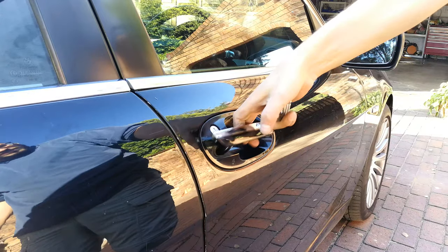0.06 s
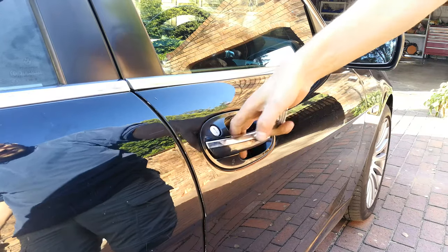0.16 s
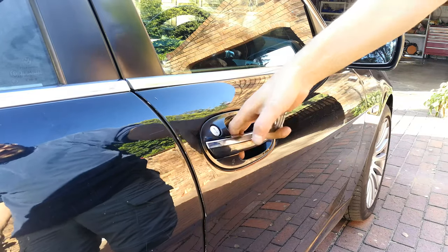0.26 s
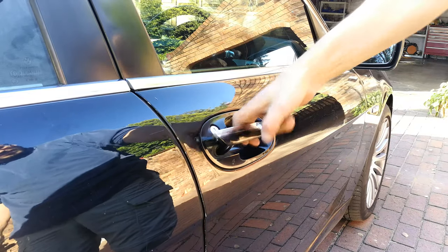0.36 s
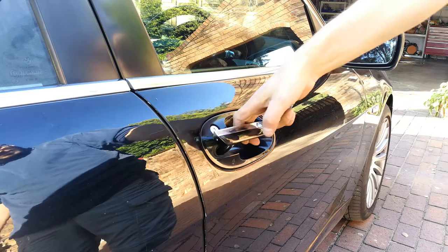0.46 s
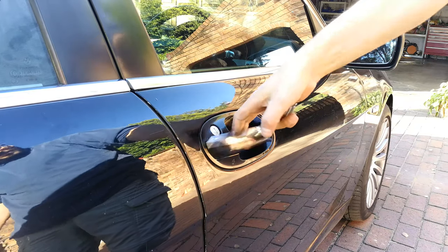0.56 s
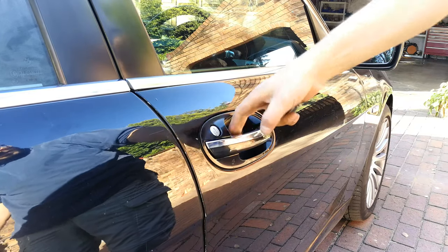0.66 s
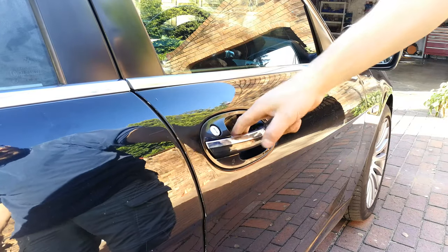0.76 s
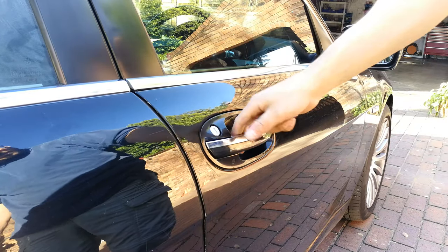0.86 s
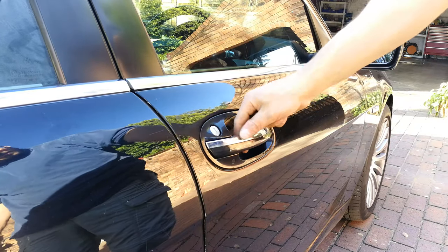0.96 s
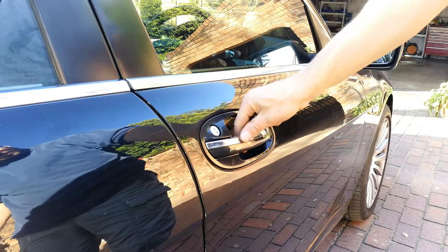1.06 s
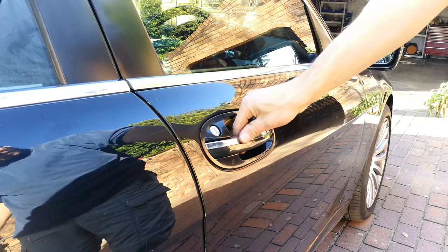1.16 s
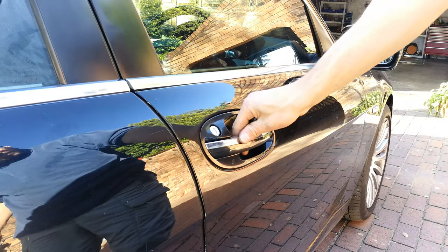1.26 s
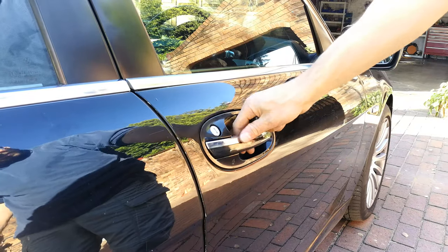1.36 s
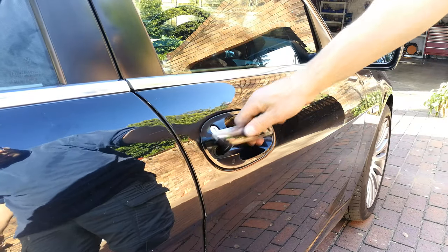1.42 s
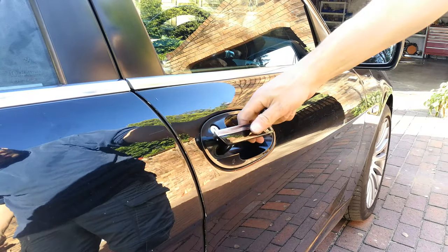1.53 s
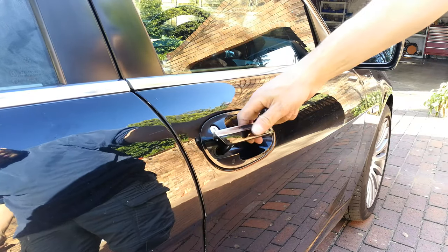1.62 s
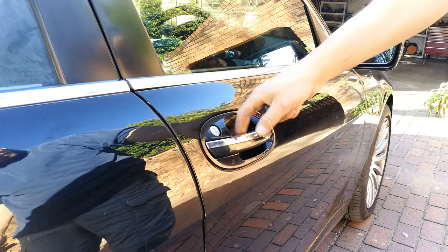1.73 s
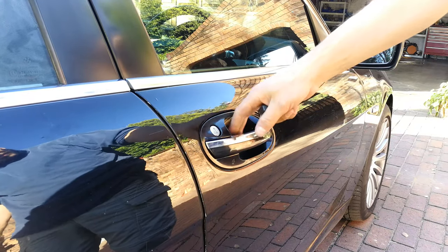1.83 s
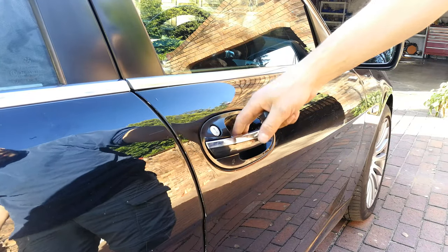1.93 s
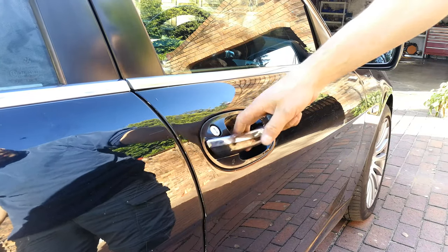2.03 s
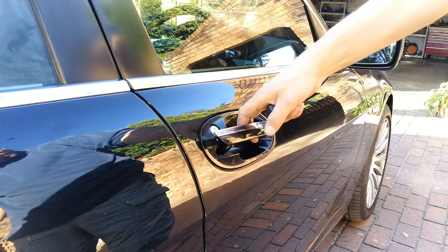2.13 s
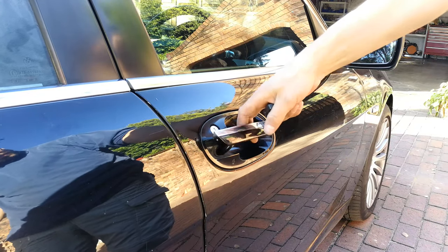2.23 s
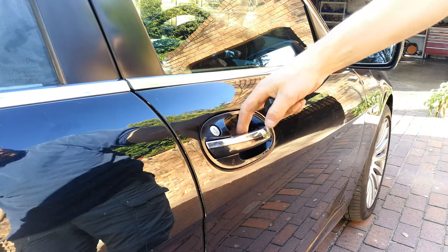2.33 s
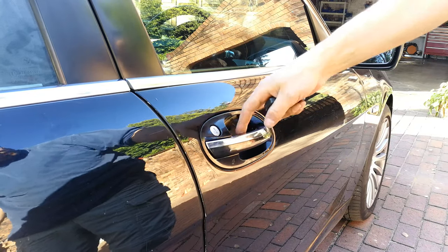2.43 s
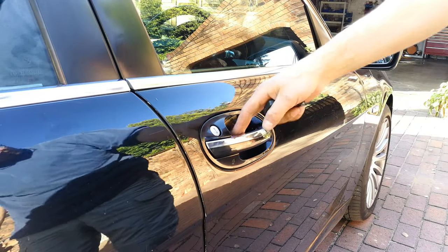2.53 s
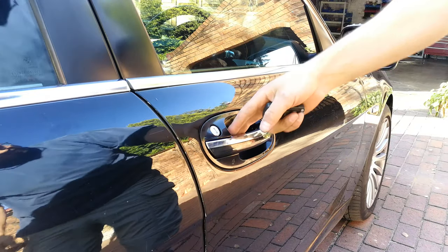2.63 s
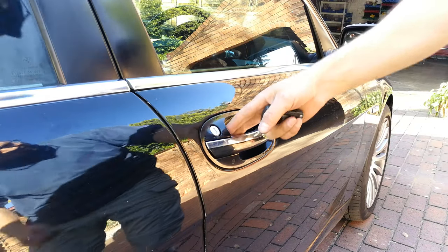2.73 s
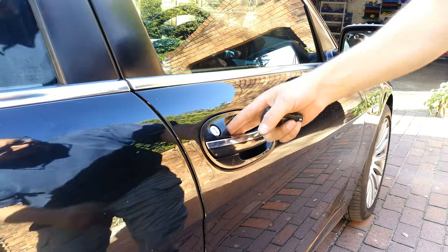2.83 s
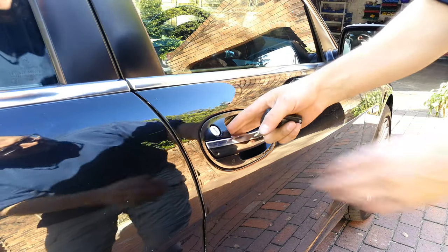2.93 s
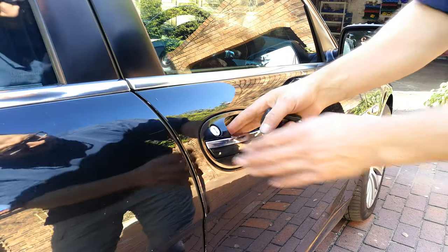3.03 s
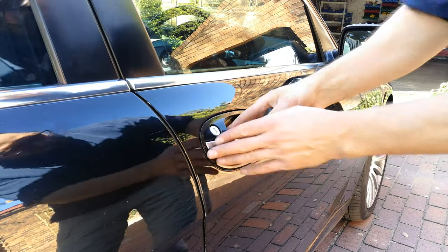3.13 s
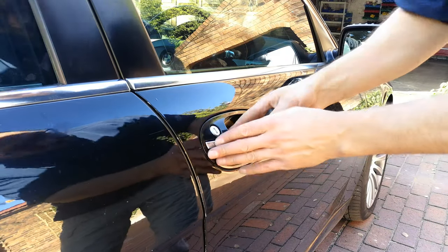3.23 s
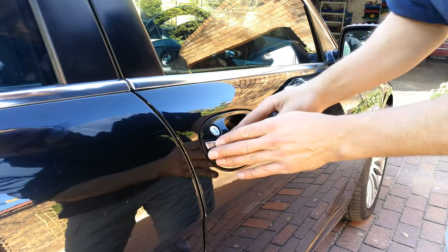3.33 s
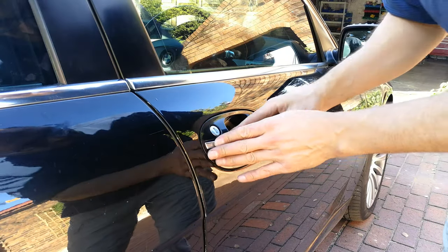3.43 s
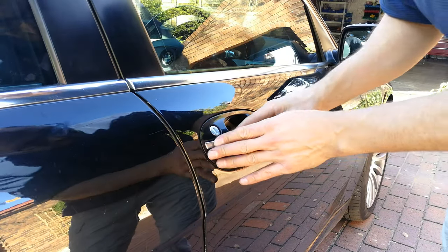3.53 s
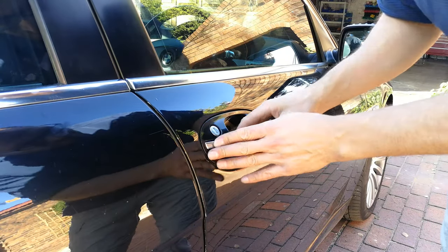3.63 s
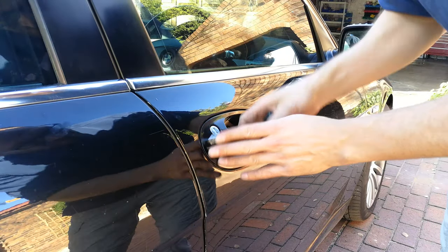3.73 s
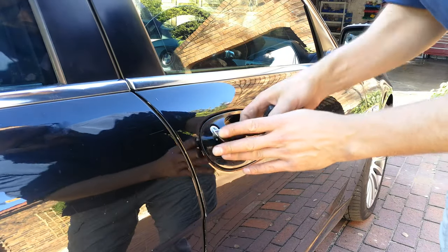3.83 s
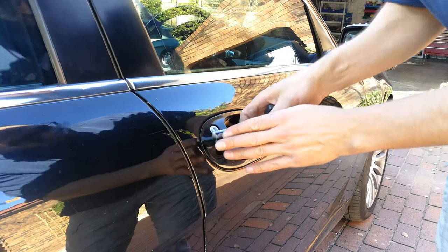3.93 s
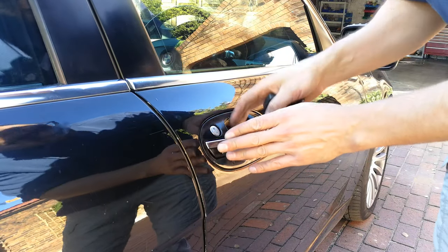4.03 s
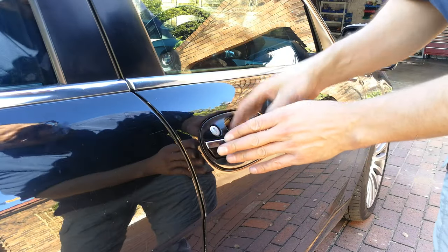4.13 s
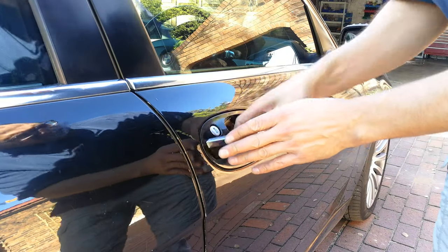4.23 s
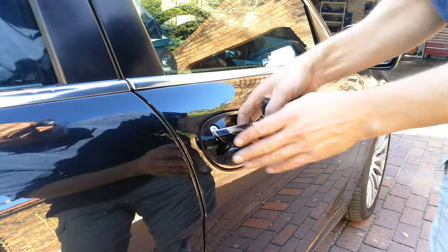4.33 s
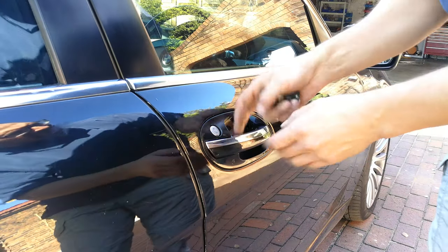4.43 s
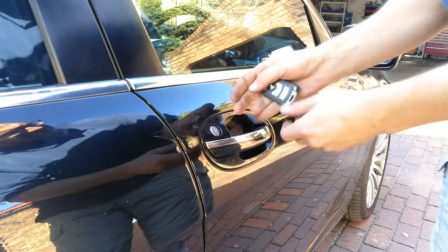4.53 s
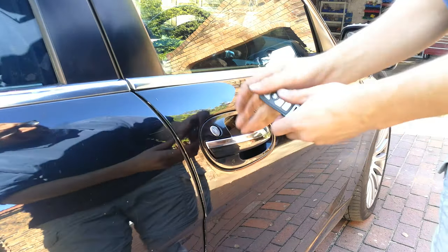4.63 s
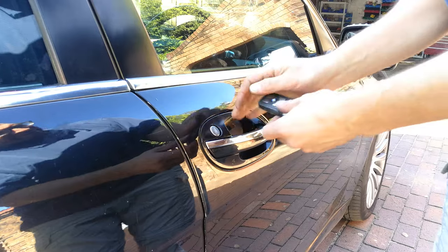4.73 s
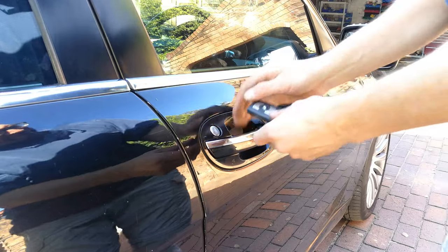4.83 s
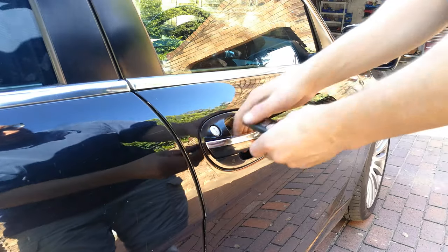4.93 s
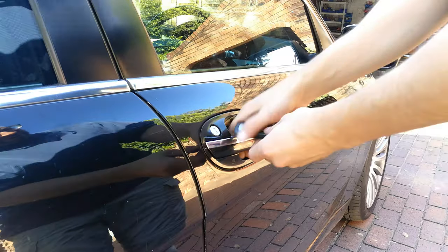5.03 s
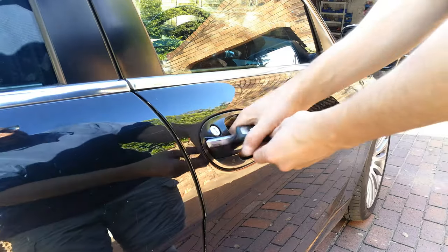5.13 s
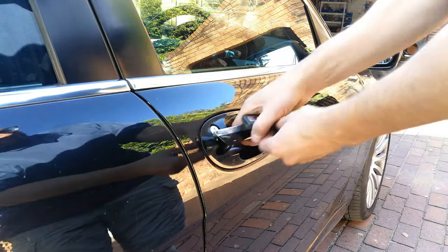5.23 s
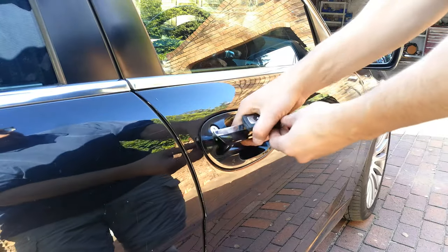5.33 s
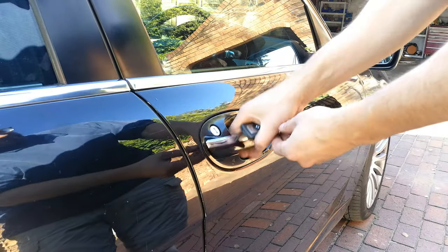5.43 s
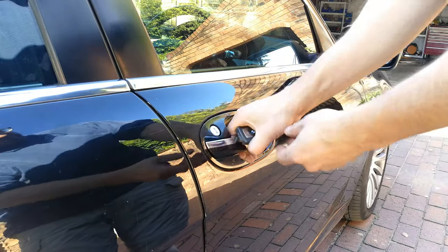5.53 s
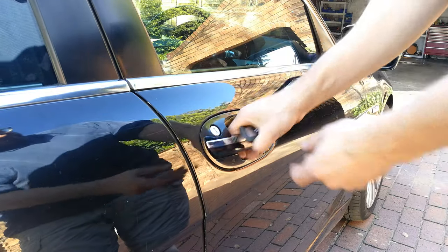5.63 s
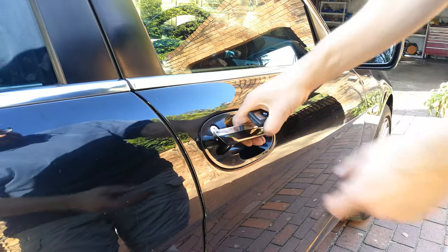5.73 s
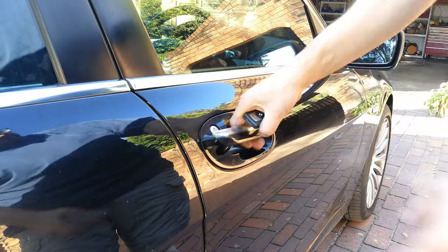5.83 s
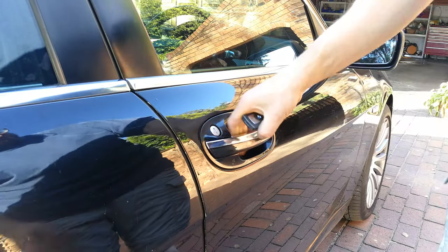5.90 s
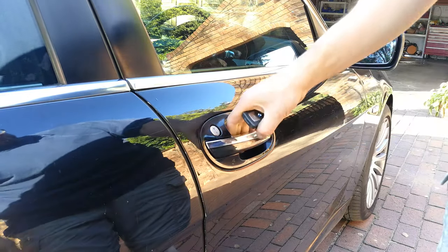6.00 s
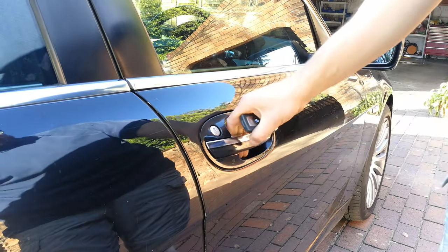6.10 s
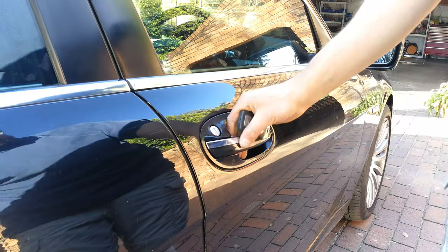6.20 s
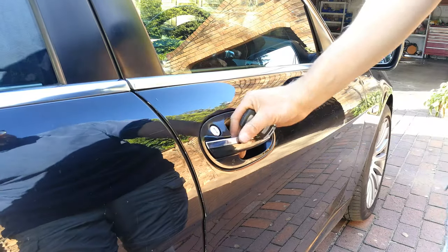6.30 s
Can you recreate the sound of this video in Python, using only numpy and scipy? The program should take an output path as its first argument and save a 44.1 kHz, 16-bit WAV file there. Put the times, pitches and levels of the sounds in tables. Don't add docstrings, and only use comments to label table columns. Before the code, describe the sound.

Close, sharp clacks of a car door handle snapping out and knocking home at uneven intervals, quiet outdoor yard with far traffic rumble.

```python
import sys
import numpy as np
from scipy import signal
from scipy.fft import rfft, irfft, next_fast_len
from scipy.io import wavfile
from scipy.ndimage import uniform_filter1d, map_coordinates

SR = 44100
rng = np.random.default_rng(int(sys.argv[2]) if len(sys.argv) > 2 else 0)


def ratio(d):
    e = np.asarray(d, float) / 20
    return 10 ** e


def master(y):
    cut = np.clip(np.atleast_2d(y).T, -1, 1)
    pcm = np.round(cut * 32767)
    wavfile.write(sys.argv[1], SR, pcm.astype(np.int16))


N = 280476
LEAD_IN = SR // 2

# start_s, clack_db, edge_db, boom_db, latch_lead_s
PULLS = [(-.039, -14, 2.5, -15, .014), (0.4406, -11, 2, -14.4, .0136), (1.522, -19, -5, -17.2, .0185),
         (2.161, -16.5, -2.5, -15.8, .0168), (3.8509, -13, 2.5, -13.5, .0142),
         (4.2952, -9.5, 2, -12.7, .0102), (5.2465, -14, -1.5, -13.2, .0145), (5.7558, -14, 0, -13.7, .0140)]
# latch_leads_ahead, level_db, pitch_hz, t60_s, boom_db
RUN_UP = [
    (3.0, -56, 1700, .06, -60),
    (1.85, -44.5, 1400, .11, -41),
    (.7, -36, 1150, .03, -46),
]
# start_s, tick_db, knock_delay_s, knock_db, boom_db
RETURNS = [(.1632, -38, .019, -34.5, -39), (.634, -33, .014, -26.5, -34), (1.7653, -33, .0125, -29, -32),
           (2.3712, -30, .0118, -27, -41), (4.02, -33, .012, -27.5, -39), (4.4594, -31, .0106, -29.5, -38),
           (5.4766, -40, .0218, -37.5, -41), (5.934, -36, .012, -32, -35)]
# start_s, clack_db, edge_db, boom_db
SLAMS = [(2.3934, -22.5, 3, -25), (4.0435, -16.5, -3, -25.5), (4.4798, -13, 6, -20.5)]
# favoured_hz, lift_db, ring_length_ratio, rattle_db, housing_db
LANDINGS = [(1250, 2.2, .9, .4, .3), (1150, 3, .9, 1.5, 1.5), (800, 2.2, .8, -1.2, -3),
            (780, 4, .8, .4, -2.2), (1000, 3, 1.05, -.4, .4), (1000, 5, 1.1, 1.2, 3),
            (900, 4, .65, 1.5, .6), (800, 3, .65, 1.5, .4), (1280, 13, .8, -7, -5), (980, 8, .9, -4, -4),
            (880, 8, .45, 1.5, -4)]
# delay_s, level_db
CONTACTS = [
    (.0001, -1.5),
    (.0013, -2.5),
]
# start_s, level_db, pitch_hz, boom_db
KNOCKS = [(0.666, -52, 720, -31.5), (1.133, -44.5, 1110, -55), (1.159, -51.5, 1280, -51),
          (1.177, -47, 850, -47), (1.372, -49, 920, -50.5), (1.792, -47, 850, -31.5),
          (3.488, -48.5, 850, -48.5), (4.617, -52, 1420, -39), (4.6685, -52, 430, -55),
          (4.68, -50, 520, -48), (5.125, -38, 1680, -54), (5.5485, -34, 1300, -44), (5.962, -50, 1000, -36),
          (6.29, -33, 800, -36.5)]
# start_s, level_db, centre_hz, t60_s
TICKS = [(1.134, -55, 2880, 0.02), (2.999, -56, 4500, .03), (4.8287, -47.5, 3970, 0.031),
         (5.123, -44, 3500, 0.026), (5.305, -39, 3450, 0.017), (5.548, -36, 8000, 0.016),
         (6.2882, -23, 7000, .008), (6.2885, -31, 12000, .02), (6.2928, -28.5, 7140, .022)]
# start_s, level_db
SETTLE = [(.67, -33.5), (1.787, -29), (1.836, -30.5), (2.409, -31), (2.46, -36), (4.05, -31), (4.58, -31.5),
          (5.39, -33.5), (5.958, -27), (6.012, -36)]
# start_s, level_db
RING_TAPS = [(6.2882, -15), (5.5478, -28), (5.1255, -36.5)]
# start_s, level_db
FOB = [(3.3165, -55), (3.352, -49.5), (3.375, -49.5), (3.446, -60), (3.47, -55.5)]
# start_s, length_s, level_db
SCRAPES = [(4.614, .062, -47), (4.865, .045, -54)]
# start_s, level_db
SLIPS = [(4.6135, -40), (4.617, -40), (4.6225, -38), (4.626, -35), (4.6335, -41), (4.644, -44),
         (4.651, -45), (4.661, -38), (4.6685, -42)]

# pitch_hz, level_db, t60_s
LEVER_MODES = [(509, -8, 0.033), (645, -17.5, 0.025), (849, -2, 0.033), (1000, -2, 0.034), (1100, 3, .013),
               (1256, 1.5, 0.037), (1575, -6, 0.021), (1840, -13.5, 0.034), (2576, -1, 0.011),
               (3300, -9.5, 0.016), (4100, -26, 0.0055), (4810, -3, 0.0096), (6500, -9, 0.014),
               (7600, -13, 0.018)]
HOUSING_MODES = [(434, -18, .14), (503, -16, .12), (631, -23, .1), (830, -26, .12), (1235, -25, .17),
                 (1290, -27, .15), (1660, -31, .12), (1875, -31, .12), (2270, -33, .12), (2990, -30, .09),
                 (3200, -32, .09), (3600, -34, .12), (4300, -34, .1), (4860, -33, .09)]
SKIN_MODES = [(166, -4.5, .4), (189.1, 1, .18), (198.9, -12.5, .62), (205.3, 9.5, .12), (223.7, 9, .1),
              (237.5, -5, .33), (264, -17, .7), (273.7, -19, .3), (292, -2.5, .16), (320, 9, .045),
              (350, -3, .08), (430, -9, .07)]
SEAL_MODES = [(74, -21, .3), (92.0, -6.5, .25), (100.8, -10, .8), (125.2, -6.5, .055), (151.5, -9, .14)]
GRIP_MODES = [(1172, -4, .05), (1960, 1.5, .018), (2400, -4, .012), (2820, 1, 0.015), (4300, -4, .014),
              (6340, -8, .016), (8800, -9, 0.011)]
FOB_MODES = [(2620, -3, .03), (3030, -3, .03), (3980, -3, 0.023), (4960, -7, 0.026)]
SLIP_MODES = [(1300, 0, .016), (1550, -2, .014), (2100, -7, .01), (2900, -8, .008)]

# frequency_hz, level_db
RATTLE = [(350, -9), (700, -2.5), (1300, 1.5), (2500, -7.5), (5000, -12), (8000, -18), (11000, -27.5),
          (14500, -27), (16300, -51)]
TRIM = [(80, -23), (150, 3), (260, -2), (350, -5), (480, -12), (700, -24), (1000, -52.5)]
RECESS = [(150, -20), (330, 0), (800, -3), (1400, -8), (3000, -30)]
# frequency_hz, t60_s
RATTLE_DECAY = [(300, 0.2), (1000, 0.085), (3000, 0.077), (8000, 0.048), (15000, 0.073)]
YARD = [(200, 0.55), (1000, 0.18), (4000, 0.17), (12000, 0.033)]
FAR_WALLS = [(300, .9), (1500, .6), (5000, .4)]
# frequency_hz, left_minus_right_db
LEAN = [(150, 0.5), (290, .6), (450, 2.5), (740, 6.5), (1300, 2.5), (2500, 7), (5000, 11), (14000, 5)]
# frequency_hz, phase_rad
PORT_PHASE = [(80, 0.02), (160, .12), (290, .6), (520, .8), (1000, .05), (2000, 0.02)]

# time_s, pitch_hz, level_db
WHISTLES = [
    [(1.936, 4800, -68), (1.955, 5000, -63), (1.975, 4100, -53), (1.998, 2950, -53), (2.013, 3000, -52),
     (2.038, 3760, -49), (2.058, 3580, -51), (2.074, 3300, -50), (2.088, 3600, -60)],
    [(3.885, 4900, -68), (3.903, 4900, -62), (3.922, 3900, -55), (3.942, 2950, -49), (3.955, 3020, -50),
     (3.971, 3560, -52), (3.992, 3760, -50), (4.004, 3400, -54), (4.017, 2950, -56)],
    [(5.79, 4400, -72), (5.808, 3850, -60), (5.825, 2960, -55), (5.84, 3000, -53), (5.856, 3550, -52),
     (5.866, 3740, -54), (5.888, 3660, -55), (5.897, 2950, -57), (5.915, 4050, -62)],
]
# start_s, level_db
PEEPS = [(0.099, -61), (.275, -61), (.355, -59), (0.531, -60), (.72, -64), (.82, -62), (1.01, -62)]
# time_s, pitch_hz, level_db
ENGINE = [(0, 76, -39), (.4, 76, -34.5), (.8, 75, -40.5), (1.4, 75, -42.5), (2.0, 73, -46),
          (2.7, 75, -44.5), (3.7, 74.5, -45.5), (4.5, 73, -40), (5.0, 75, -50), (5.6, 73, -49.5),
          (6.36, 74, -52.5)]
# time_s, level_db
BREEZE = [(0, -69), (2.5, -68.5), (2.7, -63.5), (2.9, -65.5), (3.25, -65), (3.48, -63), (3.62, -66),
          (3.95, -67), (4.2, -60.5), (4.4, -63.5), (4.68, -58.5), (4.8, -62.5), (5.0, -64), (5.35, -68),
          (5.97, -68.5), (6.36, -66)]
# frequency_hz, level_db (per Hz)
RUMBLE = [(15, -26), (25, 2.5), (50, -2), (80, 2), (110, -8), (220, -15), (350, -34), (500, -60)]
TRAFFIC = [(100, -24), (250, -2.5), (420, 0.5), (600, -1), (1100, -2.5), (2000, -11), (3500, -12),
           (6000, -30.5)]
HISS = [(1000, -36), (2200, -1), (4000, -0.5), (7000, -1.5), (11000, -5), (15500, -5.5)]
# frequency_hz, correlation
ALIKE = [(60, 1.0), (130, 0.99), (290, 0.7), (640, -0.63), (1410, 0.33), (3100, -0.28), (6820, -0.046),
         (15000, -0.05)]
# frequency_hz, left_minus_right_db
SIDES = [(60, 0.5), (240, 0.5), (950, 1.5), (3770, 3.5), (15000, 2.5)]


def unit(x):
    return x / np.sqrt(np.mean(x ** 2) + 1e-20)


def along(points, hz):
    f, v = np.transpose(points)
    return np.interp(np.log(hz + 1), np.log(f + 1), v)


def curves(rows, t):
    s, *columns = np.transpose(rows)
    return [np.interp(t, s, column) for column in columns]


def wobble(rate_hz):
    knots = rng.standard_normal(int(N * rate_hz / SR) + 4)
    return map_coordinates(knots, [np.arange(N) * rate_hz / SR])


def filtered(x, response):
    m = next_fast_len(x.shape[-1] + 2048)
    spectrum = rfft(x, m) * response(np.fft.rfftfreq(m, 1 / SR))
    return irfft(spectrum, m)[..., :x.shape[-1]]


def add(track, start_s, sound):
    at = round(start_s * SR) + LEAD_IN
    track[..., at:at + sound.shape[-1]] += sound


def ring(modes, t, scatter_db, attack, apart=0.):
    hz, db, t60 = np.transpose(modes)[:, :, None]
    chance = rng.standard_normal((3, len(hz), 1))
    phase = apart * np.log(hz / 150) * chance[1:]
    envelope = ratio(db + scatter_db * chance[0] - 60 * t / t60)
    waves = envelope * np.sin(2 * np.pi * hz * t + phase)
    return waves.sum(axis=1) * (1 - np.exp(-t / attack))


def dying(colour_db, slow, seconds, decays, attack=1e-4):
    t = np.arange(round(seconds * SR)) / SR
    noise = rng.standard_normal((3, len(t)))
    ports = 1.18 * noise[0] + noise[1:]
    centres = np.geomspace(200, 16000, num=7)[:, None, None]
    split = lambda f: ratio(colour_db(f)) * np.exp(-(np.log((f + 1) / centres) / 0.36) ** 2)
    bands = filtered(ports, split)
    bands = bands / np.sqrt(np.mean(bands.sum(axis=0) ** 2))
    fade = ratio(-60 * t / (slow * along(decays, centres)))
    return (bands * fade).sum(axis=0) * np.minimum(t / attack, 1)


def rush(spectrum, patchy_db):
    z = signal.stft(rng.standard_normal((2, N + 512)), nperseg=512)[2]
    field = uniform_filter1d(rng.standard_normal(z.shape[1:]), size=6, axis=0)
    field = uniform_filter1d(field, size=14, axis=1)
    pair = signal.istft(z * ratio(patchy_db * unit(field)), nperseg=512)[1][:, :N]
    angle = lambda f: np.arccos(np.clip(along(ALIKE, f), -1, 1)) / 2
    colour = lambda f: ratio(along(spectrum + [(17000, -120)], f))
    mid, side = filtered(pair, lambda f: colour(f) * [np.cos(angle(f)), np.sin(angle(f))])
    ports = np.array([mid + side, mid - side])
    return unit(filtered(ports, lambda f: ratio(along(SIDES, f) * [[.5], [-.5]])))


def handle():
    bright, door = np.zeros((2, 2, N + 2 * LEAD_IN))
    t = np.arange(SR // 20) / SR
    hard, soft = rock(slack=0.99), rock(slack=.92)
    blows, ticks, knocks = strokes()
    for (s, db, edge_db, boom_db), landing in zip(blows, LANDINGS):
        for delay, rings, sound in blow(db, edge_db, landing):
            add(door if rings else bright, s + delay, sound)
        add(door, s - .0021, ratio(boom_db - 6.5) * boom(hard))
    for s, db, hz, t60 in ticks:
        add(bright, s, tick(db, hz, t60))
    for s, db, hz, t60, boom_db in knocks:
        body, scuff = knock(db, hz, t60)
        add(door, s, body)
        add(bright, s, scuff)
        add(door, s, ratio(boom_db - 4) * boom(hard))
    for s, db in SETTLE:
        add(door, s, ratio(db) * soft)
    for s, db in RING_TAPS:
        hollow = dying(lambda f: along(RECESS, f), 1, .2, [(300, .3), (1500, .12)], attack=.004)
        add(door, s, ratio(db - 1.0) * ring(GRIP_MODES, t, scatter_db=1.5, attack=0.00017, apart=0.17))
        add(bright, s, ratio(db - 21) * hollow)
    for s, db in FOB:
        jangle = dying(lambda f: -9 * np.log2((f + 1) / 3600) ** 2, 1, .1, [(3000, .035)])
        add(door, s, ratio(db + 3.5) * ring(FOB_MODES, t, scatter_db=0.5, attack=0.00023, apart=0.55))
        add(bright, s, ratio(db - 3) * jangle)
    return bright, door


def strokes():
    blows = [pull[:4] for pull in PULLS] + SLAMS
    latches = [(s - lead, -20.5 + .25 * db, 14000, .045) for s, db, _, _, lead in PULLS]
    springs = [(s, db, 6500, .052) for s, db, *_ in RETURNS]
    nudges = [(s, db, hz, .04 + .0012 * (db + 45), boom_db) for s, db, hz, boom_db in KNOCKS]
    run_ups = [(s - ahead * lead, *touch) for s, *_, lead in PULLS for ahead, *touch in RUN_UP]
    homes = [(s + delay, db, 1470, .03, boom_db) for s, _, delay, db, boom_db in RETURNS]
    return blows, TICKS + latches + springs, nudges + run_ups + homes


def blow(db, edge_db, landing):
    centre_hz, lift_db, lasting, rattle_db, housing_db = landing
    t = np.arange(SR // 5) / SR
    short = t[:SR // 20]
    tilt = lambda f: edge_db * np.log2(f / 1500 + 1) / 2
    colour = lambda f: along(RATTLE, f) + tilt(f)
    duller = lambda f: colour(f) + f / 1600
    favour = lambda f: lift_db * (np.exp(-(np.log2(f / centre_hz) / .3) ** 2) - .4)
    lever = [(hz, level + tilt(hz) + favour(hz), lasting * t60) for hz, level, t60 in LEVER_MODES]
    low = [mode for mode in lever if mode[0] < 2200]
    high = [mode for mode in lever if mode[0] >= 2200]
    body = -ratio(db + 1.2) * ring(low, short, scatter_db=1.5, attack=.0009, apart=.12)
    housing = ratio(db + housing_db) * ring(HOUSING_MODES, t, scatter_db=3.5, attack=.006, apart=.3)
    slow = 0.92 * ratio(.45 * rattle_db)
    rattle = ratio(db + rattle_db - 6) * dying(colour, slow, .16, RATTLE_DECAY, attack=0.0014)
    rebound = ratio(db + rattle_db - 11) * dying(duller, 0.42, .15, RATTLE_DECAY, attack=.002)
    parts = [(-.0006, True, body), (0, True, housing), (0, False, rattle), (.006, False, rebound)]
    for delay, loss_db in CONTACTS:
        clink = ratio(db + loss_db) * ring(high, short, scatter_db=2.5, attack=.0003, apart=.15)
        crack = ratio(db + loss_db - 2.5) * dying(colour, .2, .05, RATTLE_DECAY)
        parts += [(delay, True, clink), (delay, False, crack)]
    return parts


def tick(db, hz, t60):
    colour = lambda f: np.where(f > hz, -30, -1.6) * np.log2((f + 100) / hz) ** 2
    decays = [(1000, 3.9 * t60), (12000, 0.27 * t60)]
    return ratio(db + 2) * dying(colour, 0.61, .1, decays, attack=.0007)


def knock(db, hz, t60):
    t = np.arange(SR // 20) / SR
    grip = [(hz, 0, .011), (hz * 2.2, -11, .011), (hz * .82, -21, .06), (hz * 1.12, -6, .011), (1010, -27, .05)]
    colour = lambda f: np.maximum(-18 * np.log2((f + 1) / hz) ** 2, along(RATTLE, f) - 5 - f / 1300)
    body = ratio(db + 17) * ring(grip, t, scatter_db=1.2, attack=0.0025, apart=0.098)
    scuff = ratio(db - 1.5) * dying(colour, 1.9, .12, [(1000, t60)], attack=0.003)
    return body, scuff


def boom(rocking):
    t = np.arange(SR // 3) / SR
    trim = unit(filtered(rng.standard_normal(len(t)), lambda f: ratio(along(TRIM, f))))
    shake = ratio(-11.5 - 60 * t / .5) * np.minimum(t / 0.0065, 1) * trim
    skin = ring(SKIN_MODES, t, scatter_db=.5, attack=.01)[0]
    return (skin + shake + rocking) * np.cos(1.5 * np.pi * t)


def rock(slack):
    t = np.arange(SR // 3) / SR
    back = t - .0448
    swell = np.exp(-(np.minimum(back, 0) / 0.021) ** 2) * np.minimum(t / .006, 1)
    bent = back - 4.5 * np.minimum(back, 0) ** 2
    swings = [ratio(db - 60 * np.abs(back) / t60) * np.sin(2 * np.pi * hz * slack * bent)
              for hz, db, t60 in SEAL_MODES]
    return swell * sum(swings)


def scrapes():
    slips, t = np.zeros(N), np.arange(SR // 20) / SR
    for s, length, db in SCRAPES:
        where, size = rng.random((2, 24))
        at = np.round((s + length * where) * SR).astype(int)
        slips[at] = ratio(db - 14 * size) * np.sign(size % .2 - .1)
    for s, db in SLIPS:
        slips[round(s * SR)] = ratio(db + 2.5)
    grip = ring(SLIP_MODES, t, scatter_db=1, attack=.0003, apart=.15)
    return signal.fftconvolve(slips[None], grip, axes=1)[:, :N]


def fingers():
    middle_s, width_s = .92, .085
    level_db = -53 - 9 * ((np.arange(N) / SR - middle_s) / width_s) ** 2
    squeak = [(1800, -45.5), (3100, -2.2), (3500, -5), (3900, -1.2),
              (4800, -3), (5400, -8), (6200, -5), (9000, -28)]
    return ratio(level_db + 2.2 * wobble(45)) * rush(squeak, patchy_db=3.5)


def walls(x, decays, seconds, delay):
    tail = np.pad(dying(lambda f: 0 * f, 1, seconds, decays), ((0, 0), (delay, 0)))
    tail = tail / np.linalg.norm(tail[0])
    return signal.fftconvolve(x.mean(axis=0)[None], tail, axes=1)[:, :x.shape[1]]


def birds():
    song, t = np.zeros(N + 2 * LEAD_IN), np.arange(SR // 5) / SR
    for call in WHISTLES:
        start_s, (end_s, end_hz, _) = call[0][0], call[-1]
        hz, db = curves(call + [(end_s + .012, end_hz, -100)], start_s + t)
        phase = 2 * np.pi * np.cumsum(uniform_filter1d(hz, size=260)) / SR
        add(song, start_s, ratio(db + 2.2 * wobble(65)[:len(t)]) * np.sin(phase))
    for s, db in PEEPS:
        swell = np.exp(-((t - .015) / 0.0073) ** 2)
        add(song, s, ratio(db) * swell * np.sin(2 * np.pi * 2700 * t))
    echoes = dying(lambda f: 0 * f, 1, 0.35, [(3000, 0.53), (5000, .35)], attack=.012)
    wet = signal.fftconvolve(song[None], echoes / np.linalg.norm(echoes[0]), axes=1)
    return (song + ratio(-1.2) * wet[:, :len(song)])[:, LEAD_IN:LEAD_IN + N]


def drone():
    hz, db = curves(ENGINE, np.arange(N) / SR)
    phase = 2 * np.pi * np.cumsum(hz + 2.5 * wobble(24)) / SR
    sixth_phase = 6 * 2 * np.pi * np.cumsum(hz + .5 * wobble(10)) / SR
    sixth = ratio(-76 + 4 * wobble(1.5)) * np.sin(sixth_phase)
    second = ratio(-22 + 4.1 * wobble(3)) * np.sin(2 * phase)
    return ratio(db + 2.3 * wobble(8)) * (np.sin(phase) + second) + sixth


def air():
    t = np.arange(N) / SR
    street_db = .25 * (curves(ENGINE, t)[1] + 45)
    breeze_db, = curves(BREEZE, t)
    low = ratio(-50.5 + street_db + 1.5 * wobble(7)) * rush(RUMBLE, patchy_db=.8)
    traffic = ratio(-58.3 + street_db) * rush(TRAFFIC, patchy_db=0.63)
    hiss = ratio(breeze_db + 5.5) * rush(HISS, patchy_db=1.3)
    return low + traffic + hiss


def scene():
    bright, door = handle()
    lead_s = 6.5e-5
    phase = lambda f: np.pi * f * lead_s + along(PORT_PHASE, f) / 2
    left = lambda f: ratio(along(LEAN, f) / 2) * np.exp(1j * phase(f))
    near = filtered(bright + door, lambda f: left(f) ** [[1], [-1]])
    yard = ratio(-15) * walls(bright, YARD, .4, 300) + ratio(-30) * walls(bright, FAR_WALLS, .45, 2000)
    close = (near + yard)[:, LEAD_IN:LEAD_IN + N]
    return close + scrapes() + fingers() + birds() + drone() + air()


def low_pass(x):
    return signal.sosfilt(signal.butter(12, 16490, fs=SR, output="sos"), x)


def record(dry):
    x = signal.sosfilt(signal.butter(2, 22, "high", fs=SR, output="sos"), dry)
    x = x / (1 + np.abs(x / 1.05) ** 8) ** (1 / 8)
    return low_pass(x)


dry = scene()
out = record(dry)
master(out)
```